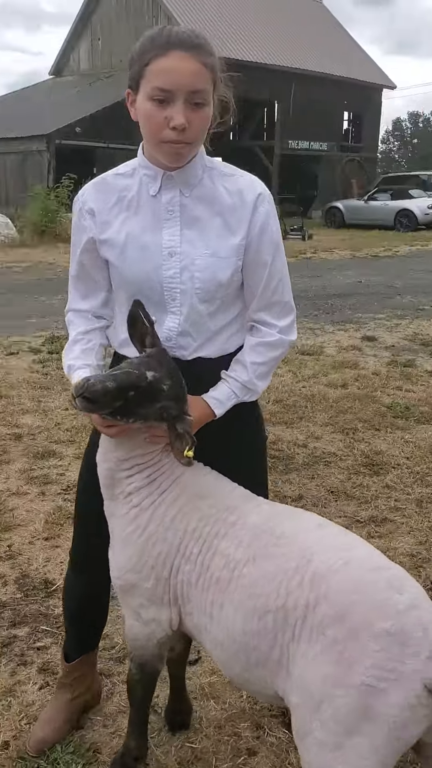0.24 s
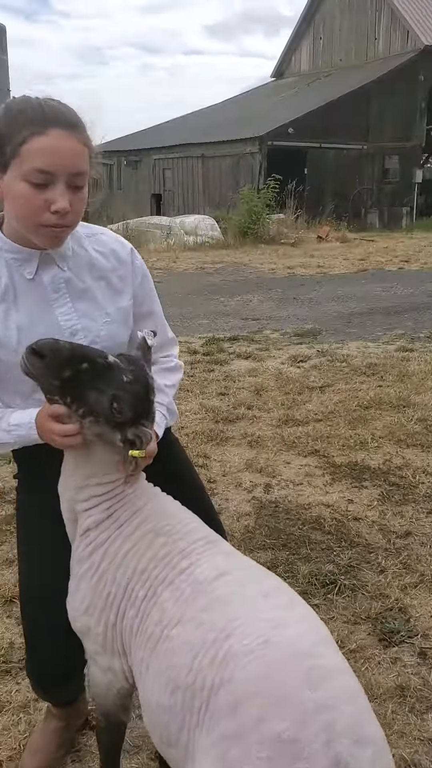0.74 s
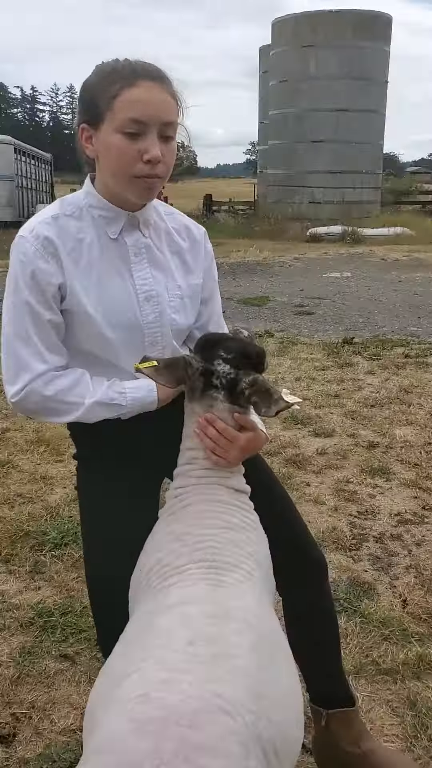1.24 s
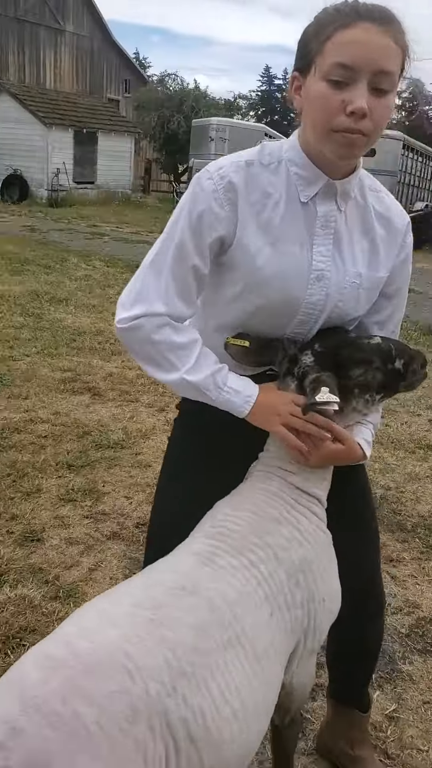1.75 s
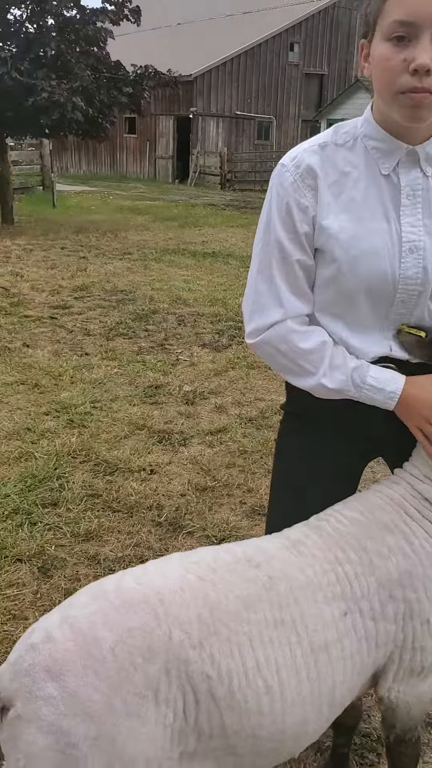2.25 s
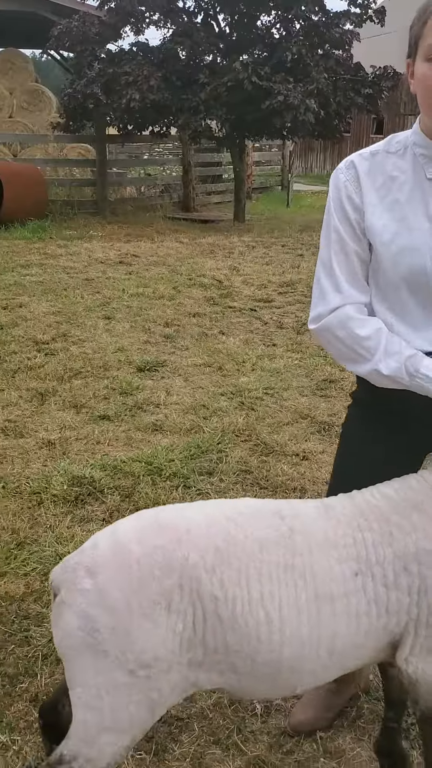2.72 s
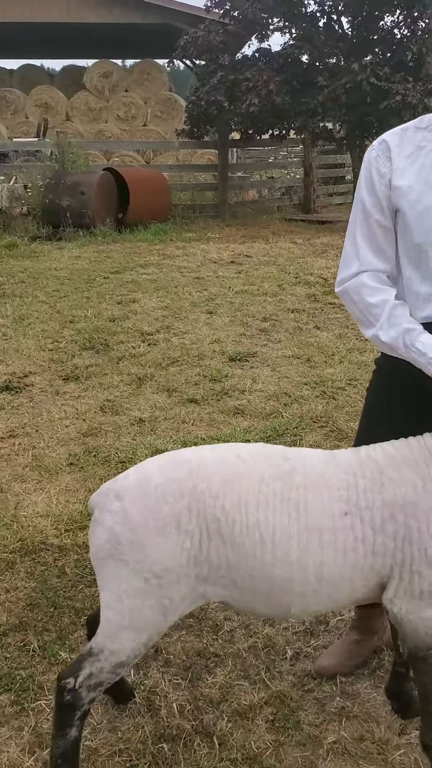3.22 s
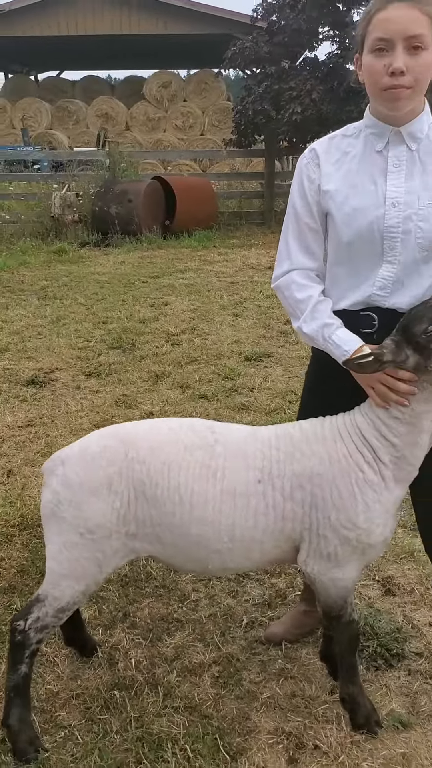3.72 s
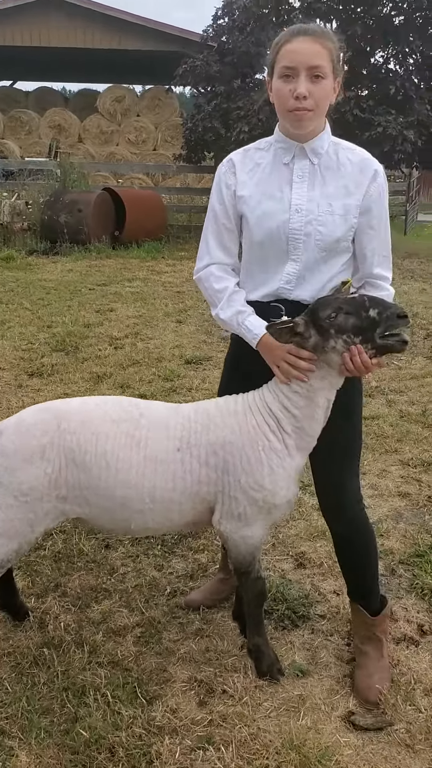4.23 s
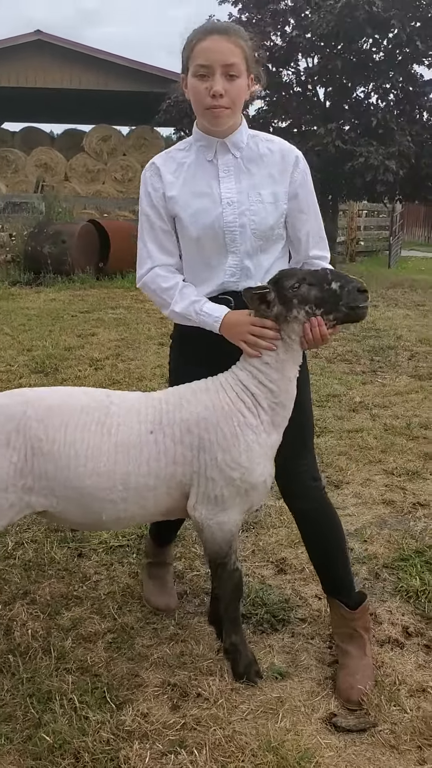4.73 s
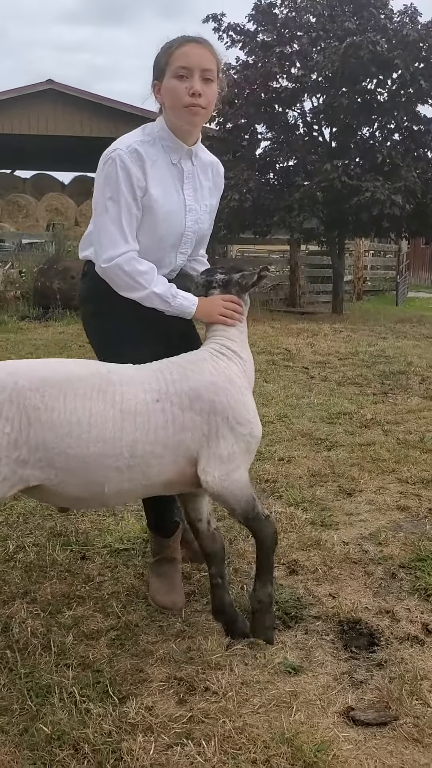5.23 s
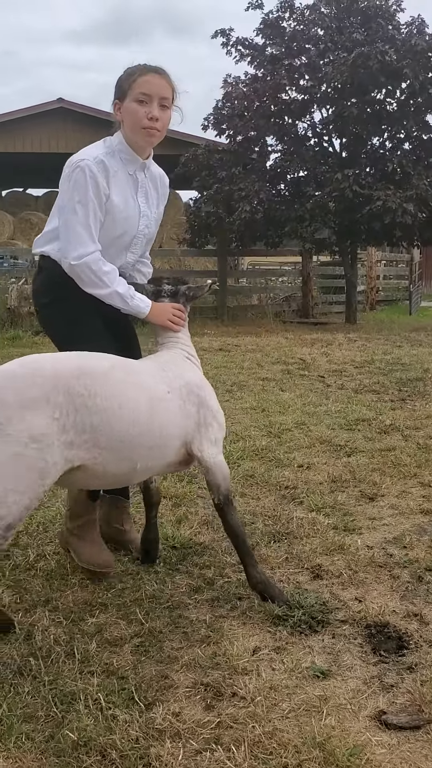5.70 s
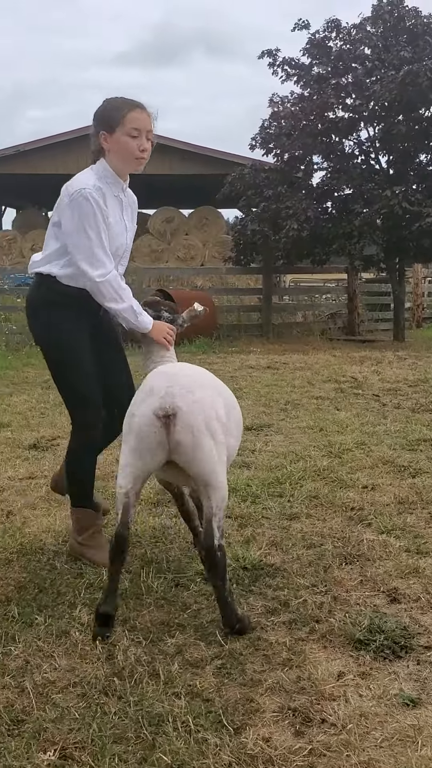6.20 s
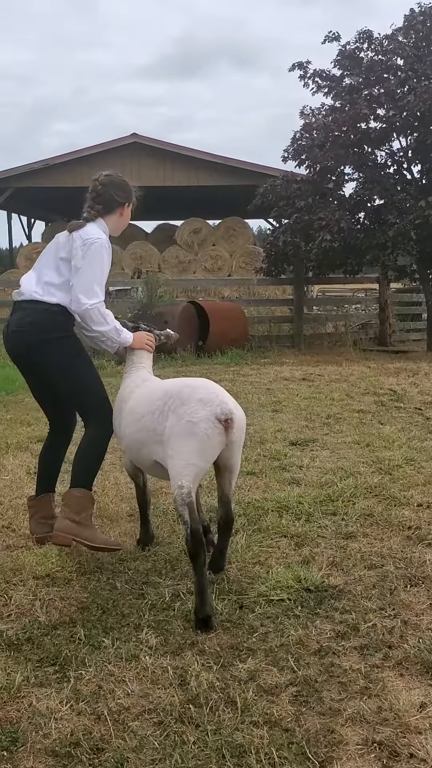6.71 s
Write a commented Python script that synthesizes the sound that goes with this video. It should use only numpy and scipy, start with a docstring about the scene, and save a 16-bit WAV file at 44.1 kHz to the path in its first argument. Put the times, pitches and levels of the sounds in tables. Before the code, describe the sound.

An open farmyard with light low breeze, a faint faraway traffic hum and thin restless hiss, a little stronger on the right. Small dry grass scuffs crackle at 0.1 s. From 0.6 to 1.1 s a distant lamb gives a thin, short, wavering bleat with some echo. Soft low footfalls thud around 1.2 to 1.45 and at 1.7 s, with scuffs near 1.7, 2.25 and 2.65 s. At about 3.15 s a low rasp opens into the main sound: a near lamb's loud, nasal, gritty bleat, around 190 Hz, catching and fluttering many times a second; its mouth closes around 3.8 s, darkening the tone, and it fades and stops near 4.3 s. Quiet follows, with faint scuffs at 4.5, 5.1 and 5.45 s. A distant bleat rises from 5.65 to 6.1 s, slightly rough, then a firmer low thud at 6.2 s, and only breeze to the end near 7 s.

```python
"""A lamb held close by in a farmyard gives one long, quavering bleat.
Another bleats twice from further off, once before and once after.
Voices follow the source-filter principle: each snap of the vocal folds rings the throat's resonances.
The near voice catches and dips many times a second, and its reflections slide as the head swings.
Sinking tones make low thuds, mostly footfalls, and showers of noise grains the scuffs in dry grass.
Coloured noise makes a light breeze, a faraway hum of traffic and a thin hiss."""
import sys
import numpy as np
from scipy import signal
from scipy.fft import rfft, irfft, next_fast_len
from scipy.io import wavfile
from scipy.ndimage import uniform_filter1d

SR = 44100
rng = np.random.default_rng(int(sys.argv[2]) if len(sys.argv) > 2 else 0)


def inscribe(sig):
    """Save sig as 16-bit PCM at rate SR to the path in sys.argv[1].

    A 1-D sig is mono; a 2-D sig holds one channel per row.
    Samples are clipped to [-1, 1] before scaling.
    """
    pcm = np.round(np.clip(np.atleast_2d(sig).T, -1, 1) * 32767)
    wavfile.write(sys.argv[1], SR, pcm.astype(np.int16))


N = 306576
T = np.arange(N) / SR

# Bleats, the near one and the two far ones: [start/s, held/s, level/dB, shortfall at onset that swells away/dB,
# fade by the end/dB, lead-in/s, mouth at first (0 wide open, 1 nearly shut), lips still to part (0-1),
# mouth closes at/s, tongue travel (ratio), tongue forward at first (ratio), treble gain/dB]
NEAR_BLEAT = (3.242, 1.047, -18.8, 0, 7.8, .04, -.2, .6, 3.84, .25, .19, 0)
FAR_BLEATS = [(.609, .505, -35.3, 4, 7, 0, -.05, 0, .98, 0, .03, -2),
              (5.648, .435, -34.3, 11, 2, .037, -.2, 0, 6.15, 0, .14, 2)]


def near_lamb():
    """Source-filter voice: the long bleat, opened by a turbulent low rasp, with moving reflections."""
    # throat resonances: [nominal width/Hz, f wide open/Hz, level/dB, f nearly shut/Hz, level/dB]
    resonances = [(111.5, 440, -3.5, 440, -2), (130, 636, 6, 728, 1.3), (150.3, 960, -.5, 950, -3),
                  (164, 1430, -3.5, 1170, -10), (158, 1700, 3.5, 1490, -3.5), (305, 2130, -1, 2030, -15.5),
                  (200, 2430, 4.8, 2430, 2.8), (213.9, 2794, -4.5, 2780, -4.5),
                  (464, 3750, -12.5, 3480, -17), (307, 4200, -16, 4350, -13), (503, 4600, -23, 4900, -23),
                  (400, 6950, -35, 7200, -27), (900, 8500, -42, 9000, -35)]
    # transmission between the resonances: [f/Hz, level/dB]
    valleys = [(60, -38), (130, -40), (200, -15), (280, -23), (1000, -13), (3000, -22), (6000, -37),
               (9000, -43), (11000, -48), (16000, -54)]
    # tune: [t/s, pitch f/Hz, roughness (0-1)]
    tune = [(3.24, 178, .55), (3.29, 180, .6), (3.335, 191, .45), (3.42, 187, .42), (3.49, 194, .3),
            (3.56, 201, .24), (3.63, 205, .26), (3.79, 194, .26), (3.88, 192, .22), (3.93, 185, .16),
            (4.02, 192, .17), (4.13, 192, .24), (4.28, 184, .26), (4.32, 154, .06)]
    # spectrum of the rasp: [f/Hz, relative level/dB]
    rasp_colour = [(40, -23), (70, -8.5), (220, 1.5), (480, -10), (610, 1.5), (950, -23.5), (2000, -23),
                   (8000, -64)]
    voice = bleat(NEAR_BLEAT, tune, (resonances, valleys), jitter=.11, shimmer_db=5, air=1.25, linger=1.63)
    voice = yard(glances(voice), lead_ms=.062, pan_db=1.6,
                 ground_db=-7.5, ground_t60=.03, barn_db=-22, barn_t60=.45)

    # the rasp swells quickly, then fades under the voice
    rasp_start_s, rasp_attack_s, rasp_db, rasp_fade_db_per_s = 3.13, .07, -31, 120
    age = T - rasp_start_s
    fade_db = rasp_fade_db_per_s * np.maximum(age - rasp_attack_s, 0)
    rasp = noise(rasp_colour, .91) * np.clip(age / rasp_attack_s, 0, 1) ** 1.5
    rasp = rasp * undb(rasp_db - fade_db + 2.5 * walk(90))
    return voice + rasp


def far_lamb():
    """Source-filter voice with a larger share of reverberation: two shorter, thinner bleats."""
    # throat resonances: [nominal width/Hz, f wide open/Hz, level/dB, f nearly shut/Hz, level/dB]
    resonances = [(135, 350, -21, 452, -0.5), (108, 805, 1, 822, 4), (250, 1110, -15, 1230, -9.5),
                  (238, 1660, 6.5, 1650, 1.5), (300, 1790, 6.5, 1700, -20), (229, 2260, 2.5, 2174, -3),
                  (300, 2830, -12, 2640, -25), (300, 4020, -22, 3950, -26)]
    # transmission between the resonances: [f/Hz, level/dB]
    valleys = [(60, -6), (200, -18.5), (600, -14.5), (3000, -33), (5500, -28), (9000, -46.5), (16000, -36)]
    # one tune for each bleat: [t/s, pitch f/Hz, roughness (0-1)]
    tunes = [
        [(.61, 197, .5), (.65, 203, .35), (.69, 213, .11), (.78, 207, .11), (.94, 202, .1), (1.01, 202, .45),
         (1.15, 182, .6)],
        [(5.61, 150, .7), (5.66, 178, .25), (5.72, 189, .3), (5.785, 201, .26), (5.875, 197, .2),
         (5.9, 190, .19), (5.98, 195, .17), (6, 188, .13), (6.05, 191, .12), (6.1, 183, .5)],
    ]
    voice = np.zeros(N)
    for call, tune in zip(FAR_BLEATS, tunes):
        voice += bleat(call, tune, (resonances, valleys), jitter=.11, shimmer_db=4.3, air=1.6, linger=1.19)
    return yard(voice, lead_ms=.071, pan_db=1.1, ground_db=-4.5, ground_t60=.21, barn_db=-9.5, barn_t60=.42)


def bleat(call, tune, shape, jitter, shimmer_db, air, linger, size=2048):
    """Pulse excitation: every closure of the vocal folds is a snap and a puff of air that ring the throat."""
    # spectral change in a catch, a thinner chest tone and sharper snap: [f/Hz, gain/dB]
    catch_colour = [(400, -5.5), (750, -.5), (2500, -2.5), (5500, 2)]
    wobble_share, wobble_per_s = .011, 70  # chance wandering of the pitch
    slap_per_rough, slap_share, slap_scatter, slap_hz = 1.5, .47, .035, 1100
    treble_hz, hoot_overtone = 2550, 4
    pre_roll = size // 32  # samples kept ahead of each snap
    start_s, held_s, _, _, _, lead_s, *_, treble_db = call

    # the running phase, in cycles, sets the time of each closure
    t = T[int((start_s - lead_s) * SR):int((start_s + held_s + .09) * SR)]
    pitch, hoot, *_ = gesture(t, call, tune)
    cycles = np.cumsum(pitch * (1 + wobble_share * walk(wobble_per_s)[:len(t)])) / SR
    chance = rng.standard_normal((size // 8, size))[:int(cycles[-1]) + 1]
    at = np.interp(np.arange(len(chance)), cycles, t)
    controls = [c[:, None] for c in gesture(at, call, tune)]
    pitch, _, level_db, rough, caught, mouth, tongue, forward = controls
    hz, age = np.fft.rfftfreq(size, 1 / SR), np.arange(size) / SR

    # rough cycles come early or late, vary in strength and leak more air
    start = (at + jitter * (rough ** 2 / pitch)[:, 0] * chance[:, 0]) * SR
    puff = chance * np.exp(-age * pitch / 1.1)
    puff = rfft(puff / np.linalg.norm(puff, axis=1, keepdims=True))
    source = 1 + air * rough * puff * np.minimum(hz / 2000, 1.3) ** .9

    # rough folds slap shut a second time, near the middle of the cycle
    slap_s = (slap_share + slap_scatter * chance[:, 1:2]) / pitch
    slap = slap_per_rough * rough * (1 - caught) * hz / (hz + slap_hz)
    source = source + slap * np.exp(-2j * np.pi * hz * slap_s)

    # a harder push is brighter, so the dying voice keeps only its low partials
    tilt = undb(.045 * (level_db - level_db.max()) * np.log2(np.clip(hz, 500, 6000) / 1200))
    treble = undb(treble_db * (.5 + .5 * np.tanh((hz - treble_hz) / 200)))
    gain = throat(hz, mouth, tongue, forward, rough, *shape) * treble * tilt
    ringing = causal(gain * colour(catch_colour, hz) ** caught, linger)

    delay = (start % 1 + pre_roll)[:, None]
    rings = irfft(source * ringing * np.exp(-2j * np.pi * hz / SR * delay))
    # scale each ring to rms 1 over its cycle before setting its level
    rings *= np.sqrt(SR / pitch) / np.linalg.norm(rings, axis=1, keepdims=True)
    rings *= undb(level_db + shimmer_db * rough * chance[:, -1:])
    out = np.zeros(N)
    for i, ring in zip(start, rings):
        add(out, (i - pre_roll) / SR, ring)
    # in a catch the fourth harmonic hoots as a pure tone
    add(out, t[0], hoot * np.cos(2 * np.pi * hoot_overtone * cycles))
    return out


def gesture(t, call, tune):
    """Articulatory control: effort swells, fades and collapses while larynx, mouth and tongue move."""
    # effort leaps up at the start, swells a little more, and collapses at the end
    attack_db, attack_s, swell_s, release_db_per_s = 21, .004, .045, 290
    lead_in_db = 23  # greatest shortfall of the onset
    # shares of the bleat's length
    closing_share, parting_share, tongue_lowest_share = .08, .065, .41
    narrowing, narrowing_s = .45, .3  # the mouth narrows soon after the first gape
    draw_back_s = .27  # the tongue starts forward, raising a middle resonance, and draws back
    catch_rough, catch_tongue_lift, hoot_trim_db = .06, .04, -3
    (start_s, held_s, db, swell_db, fade_db, _,
     opening, parting, closes_s, travel, forward_share, _) = call

    age = np.maximum(t - start_s, 0)
    progress = age / held_s
    pitch, rough = curves(tune, t)
    caught, caught_hz, dip_db, hoot = catches(t)

    rise_db = attack_db * np.exp(-age / attack_s) + swell_db * np.exp(-age / swell_s)
    rise_db = np.minimum(rise_db, lead_in_db)
    collapse_db = release_db_per_s * np.maximum(age - held_s, 0)
    effort_db = db - rise_db - fade_db * progress ** 2 - collapse_db

    closed = .5 + .5 * np.tanh((t - closes_s) / (2 * closing_share * held_s))
    opening = opening + narrowing * (1 - np.exp(-age / narrowing_s))
    opening = opening + parting * np.exp(-np.square(progress / parting_share))
    mouth = opening + (1 - opening) * closed
    tongue = 1 + travel * np.abs(progress - tongue_lowest_share) ** 1.5 + catch_tongue_lift * (caught - .5)
    forward = 1 + forward_share * np.exp(-age / draw_back_s)

    pitch = pitch * (1 - caught) + caught_hz
    hoot = hoot * undb(effort_db + hoot_trim_db)
    return pitch, hoot, effort_db - dip_db, rough + catch_rough * caught, caught, mouth, tongue, forward


def catches(t):
    """Frequency and amplitude modulation: brief catches of the larynx, 0-1, with their pitch, dip and hoot."""
    # catches: [middle t/s, length/s, pitch it falls to f/Hz, dip/dB, hoot against the voice before trim/dB]
    quaver = [(3.271, .009, 170, 7, -1), (3.302, .03, 146, 6, -5), (3.36, .024, 162, 1, 3),
              (3.385, .026, 169, 2, 5), (3.424, .02, 168, 2, -2), (3.457, .028, 164, 3, -2),
              (3.525, .028, 164, 2, -1), (3.592, .024, 166, 2, -3), (3.657, .026, 167, 4, -7),
              (3.724, .016, 174, 2, -5), (3.751, .018, 177, 2, -8), (3.845, .012, 186, 1, -14),
              (3.873, .016, 178, 2, -12), (3.908, .012, 180, 1, -12), (3.982, .018, 170, 1, -6),
              (4.05, .026, 169, 2, 3), (4.084, .014, 173, 2, 1), (4.113, .024, 167, 1, 4),
              (4.178, .048, 169, 2, 2), (4.243, .044, 158, 6, -9), (4.325, .05, 153, 6, -12),
              (.635, .01, 194, 9, -15), (.752, .024, 195, 1, -18), (.974, .034, 187, 1, -18),
              (1.035, .02, 190, 2, -14), (1.068, .026, 182, 2, -6), (5.735, .022, 168, 0, -20),
              (5.823, .05, 172, 1, -22)]
    middle_s, length_s, hz, dip_db, hoot_db = np.transpose(quaver)
    caught = np.exp(-np.square(np.square(2 * (t[:, None] - middle_s) / length_s)))
    # overlapping catches share the larynx
    share = caught / np.maximum(caught.sum(axis=1), 1)[:, None]
    return share.sum(axis=1), share @ hz, share @ dip_db, caught ** 2 @ undb(hoot_db)


def throat(hz, mouth, tongue, forward, rough, resonances, valleys):
    """Formant filter: resonances slide with mouth and tongue, and flutter from cycle to cycle when rough."""
    flutter_per_rough = .03
    power = colour(valleys, hz) ** 2
    for width, open_hz, open_db, shut_hz, shut_db in resonances:
        shift = 1
        if 1500 <= open_hz < 2000:
            shift = forward
        elif 2000 <= open_hz < 3300:
            shift = tongue
        centre = (open_hz + mouth * (shut_hz - open_hz)) * shift
        centre = centre * (1 + flutter_per_rough * rough * rng.standard_normal(rough.shape))
        peak = undb(open_db + mouth * (shut_db - open_db)) ** 2
        power = power + peak / (1 + np.square((hz - centre) / (width * .64))) ** 2
    return np.sqrt(power)


def causal(gain, linger):
    """Minimum phase from the cepstrum; linger above 1 lets the resonances build up a little late."""
    cepstrum = irfft(np.log(gain + 1e-9))
    cepstrum[:, cepstrum.shape[-1] // 2:] = 0
    return gain * np.exp(2j * linger * rfft(cepstrum).imag)


def glances(x):
    """Comb filtering: treble glances off flank and handler, and the path lengths slide as the head swings."""
    glance_hz = 2000
    treble = signal.sosfilt(signal.butter(2, glance_hz, "high", fs=SR, output="sos"), x)
    out = np.array([x, x])
    # lag at the bleat's start/ms, change/(ms per s), left/dB, right/dB
    for lag_ms, ms_per_s, left_db, right_db in [(1.9, 1.3, -7, -15), (5.3, -1.5, -14, -10)]:
        late_s = (lag_ms + ms_per_s * (T - NEAR_BLEAT[0])) / 1000
        out = out + undb(np.array([[left_db], [right_db]])) * np.interp(T - late_s, T, treble)
    return out


def yard(x, lead_ms, pan_db, ground_db, ground_t60, barn_db, barn_t60):
    """Room response: direct sound leading on the left, quick scatter from nearby, a dull wash from the barns."""
    age = T[:SR]
    hz = np.fft.rfftfreq(SR, 1 / SR)

    def scatter(t60, onset_s, points):
        """Diffuse reverberation: noise with an exponential decay."""
        tail = rng.standard_normal((2, SR)) * undb(-60 * age / t60) * (1 - np.exp(-np.square(age / onset_s)))
        return rfft(tail / np.linalg.norm(tail, axis=1, keepdims=True)) * colour(points, hz)

    nearby = scatter(ground_t60, .00072, [(230, -17), (650, 1), (1400, 2), (5000, 3), (10000, 5)])
    barns = scatter(barn_t60, .013, [(200, -24.5), (800, 5), (2000, 6), (2800, -2), (6000, -9.5)])
    # the phase between the channels stops growing in the treble
    phase = np.minimum(2 * np.pi * hz * np.array([[0], [lead_ms / 1000]]), 1.2)
    # the nearby scatter reaches the two channels in opposite phase
    ground = undb(ground_db) * nearby[0] * np.array([[1], [-1]])
    response = irfft(np.exp(-1j * phase) + ground + undb(barn_db) * barns)[:, :SR // 2]
    wet = signal.fftconvolve(np.atleast_2d(x), response, axes=1)[:, :N]
    return wet * undb(np.array([[pan_db], [-pan_db]]) / 2)


def thuds():
    """Damped oscillation: low thuds that sink in pitch, each with a short knock of noise."""
    # low thuds: footfalls on turf, and at 3.325 s a low puff of the near lamb or wind:
    # [t/s, level/dB, nominal pitch f/Hz, 60 dB decay/s, knock against the thud/dB]
    low_thuds = [(0.403, -39, 78.5, 0.11, -33), (1.193, -38, 90, 0.22, -18), (1.38, -38, 135, .2, 3),
                 (1.403, -35.5, 150, .15, -34), (1.433, -32.5, 112, 0.13, -22),
                 (1.674, -34.5, 91, 0.29, -14), (2.651, -37, 74, 0.11, -15.5), (3.325, -32.5, 85, 0.2, -30),
                 (5.74, -44.5, 167, 0.27, -1.5), (5.979, -41, 196, 0.12, -2),
                 (6.167, -29, 166.7, 0.12, -19.5)]
    out, age = np.zeros((2, N)), T[:SR // 3]
    knock = noise([(80, -5), (400, -1), (1200, -9), (2000, -28.5), (9000, -41)], 1.0)
    for s, db, hz, ring_s, knock_db in low_thuds:
        # from about 2.2 times the nominal pitch down to 0.72 times
        phase = 2 * np.pi * np.cumsum(hz * (.72 + 1.47 * np.exp(-age / .0054))) / SR
        thud = np.sin(phase) * undb(-60 * age / ring_s) * (1 - np.exp(-age / .0035))
        i = int(s * SR)
        tap = undb(knock_db) * knock[:, i:i + len(age)] * np.exp(-age / .021)
        add(out, s, undb(db) * (thud + tap))
    return out


def scuffs():
    """Granular noise through paired resonances: dry stalks crackle in brief showers of uneven grains."""
    # showers: [t/s, time to peak/s, level/dB, centre f/Hz, half-width/octaves, upper resonance against lower/dB]
    showers = [(0.071, 0.01, -47, 2350, 0.95, -9), (.086, 0.005, -40.5, 486, 0.25, -15),
               (.09, .0015, -43, 2200, .6, -2), (0.539, 0.022, -48, 1670, .6, -15),
               (1.038, 0.008, -41, 3930, 0.3, -15), (1.165, 0.011, -45.5, 6860, 3, -15),
               (1.686, 0.0093, -40, 1850, 0.25, -10), (2.22, .022, -47.5, 2100, .2, 4),
               (2.243, .002, -35.5, 2100, .22, 6), (2.251, .003, -41, 2050, .2, 1),
               (2.632, 0.0055, -42, 1750, 0.22, -12), (4.462, 0.015, -48, 1980, 0.3, -9),
               (4.497, .008, -49, 1950, .25, -10), (5.123, .014, -55, 2200, .5, -3),
               (5.135, .0016, -48, 2100, .22, 1), (5.149, 0.0025, -45, 2100, 0.35, -8),
               (5.446, 0.00081, -43.5, 3200, 0.61, -12)]
    upper_ratio = 1.83  # upper resonance over lower, in frequency
    out, age = np.zeros((2, N)), T[:SR // 3]
    hz = np.fft.rfftfreq(len(age), 1 / SR) + 1
    for s, rise_s, db, centre_hz, octaves, upper_db in showers:
        uneven_db = 2.4 * rng.exponential(size=len(age)) + 4 * walk(400)[:len(age)]
        grains = rng.standard_normal((3, len(age))) * undb(uneven_db)
        # one stream common to both channels, one more for each
        stereo = grains[0] + 1.7 * grains[1:]
        swell = (age / rise_s * np.exp(1 - age / rise_s)) ** 1.5
        lower = 1 / (1 + np.square(np.log2(hz / centre_hz) / octaves))
        upper = 1 / (1 + np.square(np.log2(hz / (centre_hz * upper_ratio)) / octaves))
        x = swell * irfft(rfft(stereo) * np.hypot(lower, undb(upper_db) * upper))
        add(out, s, undb(db) * x * swell.std() / x.std())
    return out


def breeze(level_db):
    """Turbulence: low-frequency noise whose level wanders with the gusts."""
    # spectrum: [f/Hz, relative level/dB]
    breeze_colour = [(15, -19), (30, -17), (52, 0), (90, -2.5), (150, -9.5), (220, -13), (400, -22.5),
                     (900, -55)]
    return noise(breeze_colour, .72) * undb(level_db + 2.6 * walk(18))


def traffic(level_db):
    """Incoherent sum of distant sources: a mid-frequency noise of wandering level."""
    # spectrum: [f/Hz, relative level/dB]
    traffic_colour = [(100, -13), (250, -2.5), (450, 1.5), (750, 3), (1100, 6), (1500, -1.5), (2200, -10),
                      (3500, -38.5), (8000, -43.5)]
    return noise(traffic_colour, .61) * undb(level_db + 2.4 * walk(9.8))


def hiss():
    """Addition of powers: a thin, restless hiss swells with rustling grass and late in each bleat."""
    # spectrum: [f/Hz, relative level/dB]
    hiss_colour = [(800, -5.5), (2200, -5), (3500, -5), (5000, -1.5), (8000, -6.5), (11000, -5),
                   (13500, -2), (16000, -8.5)]
    # rustling of the dry grass: [middle t/s, half length/s, level/dB]
    rustling = [(.06, .1, -58.5), (.68, .18, -57.5), (1.2, .16, -58.5), (1.9, .42, -59), (2.72, .3, -57)]
    floor_db, swell_db = -66.3, -53.2  # before ticks and pan
    swell_at_share, swell_share = .67, .33  # place and half length, in shares of the bleat
    power = undb(floor_db) ** 2
    for s, half_s, db in rustling:
        power = power + np.square(undb(db) * hump(s, half_s))
    for s, held_s, *_ in [NEAR_BLEAT, *FAR_BLEATS]:
        swell = undb(swell_db) * hump(s + swell_at_share * held_s, swell_share * held_s)
        power = power + np.square(swell)
    x = noise(hiss_colour, .071) * np.sqrt(power) * undb(1.0 * walk(70) + 1.3 * walk(11))
    # random brief ticks roughen the hiss throughout: 14 a second on average, dying away in 1.2 ms
    ticks = (rng.random(N) < 14 / SR) * rng.standard_normal((2, N))
    x = x * (1 + undb(4) * signal.lfilter([1], [1, -np.exp(-1 / (.0012 * SR))], np.abs(ticks)))
    return x * undb(np.array([[-2.9], [2.9]]))  # stronger on the right


def outdoors():
    """Superposition of the background: breeze, faraway traffic and hiss."""
    # course of the background: [t/s, breeze level/dB, traffic level/dB]
    air_levels = [(0, -55.5, -58), (.33, -59.5, -62), (.6, -54.5, -58.5), (1.9, -54, -62),
                  (2.9, -56, -57.5), (4.9, -62.5, -68.5), (5.6, -54.5, -61), (6.95, -55.5, -60.5)]
    breeze_db, traffic_db = curves(air_levels)
    return breeze(breeze_db) + traffic(traffic_db) + hiss()


def undb(db):
    """Level to amplitude: 20 dB to a factor of ten."""
    return 10 ** (np.asarray(db) / 20)


def curves(table, t=T):
    """Linear interpolation: each column of a table, joined by straight lines in time."""
    s, *columns = np.transpose(table)
    return [np.interp(t, s, c) for c in columns]


def colour(points, hz):
    """Spectral envelope: gain of (f/Hz, level/dB) points joined over log frequency."""
    f, db = np.transpose(points)
    return undb(np.interp(np.log(hz + 1), np.log(f), db))


def noise(points, likeness):
    """Filtered noise of rms 1; likeness is the share of power common to both channels."""
    share = np.clip(likeness, 0, 1)
    white = np.sqrt(share) * rng.standard_normal(N) + np.sqrt(1 - share) * rng.standard_normal((2, N))
    size = next_fast_len(N)
    x = irfft(rfft(white, size) * colour(points, np.fft.rfftfreq(size, 1 / SR)), size)[:, :N]
    return x / x.std()


def walk(rate):
    """Low-pass random process: smooth wandering with a spread near 1."""
    k = int(SR / rate)
    stairs = np.repeat(rng.standard_normal(N // k + 1), k)
    return 1.3 * uniform_filter1d(uniform_filter1d(stairs, k), k)[:N]


def hump(middle_s, half_s):
    """Gaussian envelope: a smooth rise and fall around a moment."""
    return np.exp(-np.square((T - middle_s) / half_s))


def add(out, start_s, x):
    """Superposition: mix a short sound in at the given time."""
    i = max(int(start_s * SR), 0)
    out[..., i:i + x.shape[-1]] += x[..., :N - i]


def scene():
    """Superposition of both lambs, the thuds and scuffs, and the open air."""
    return near_lamb() + far_lamb() + thuds() + scuffs() + outdoors()


def record(dry):
    """Band limiting: a steep elliptic low-pass filter removes the top of the spectrum."""
    top_hz = 15850
    return signal.sosfilt(signal.ellip(10, .2, 80, top_hz, fs=SR, output="sos"), dry)


dry = scene()
out = record(dry)
inscribe(out)
```